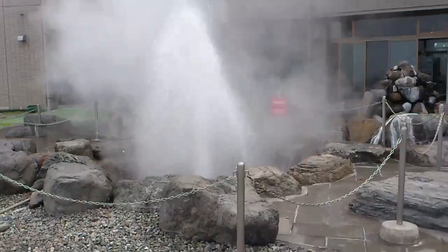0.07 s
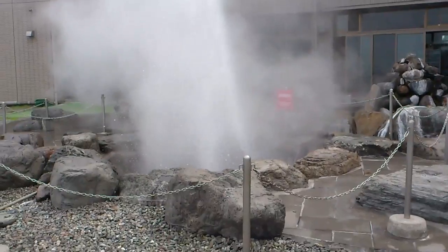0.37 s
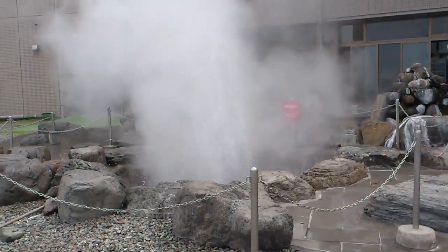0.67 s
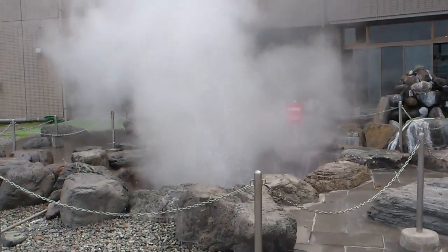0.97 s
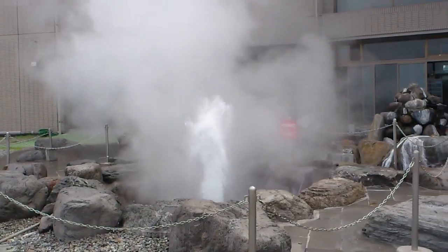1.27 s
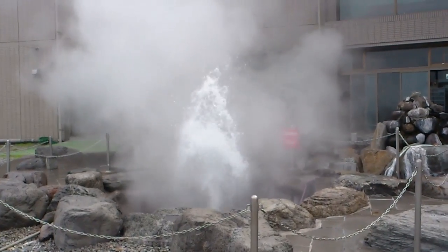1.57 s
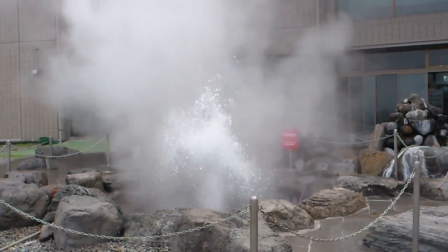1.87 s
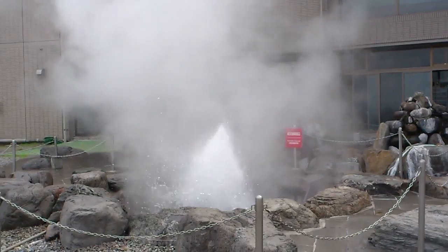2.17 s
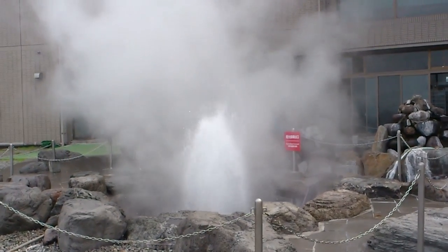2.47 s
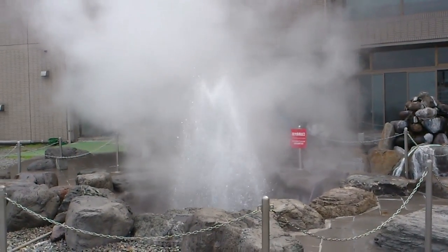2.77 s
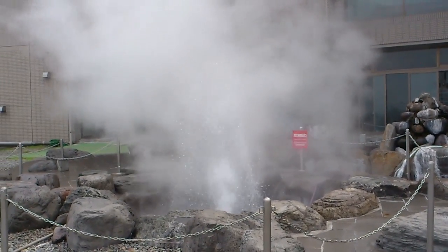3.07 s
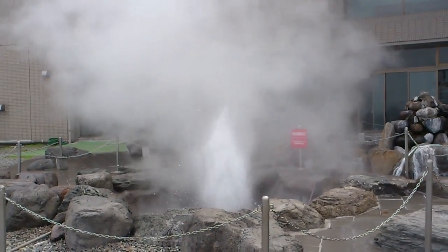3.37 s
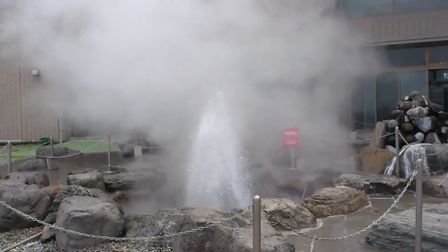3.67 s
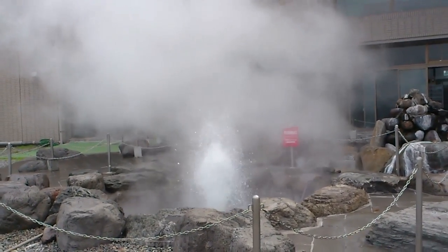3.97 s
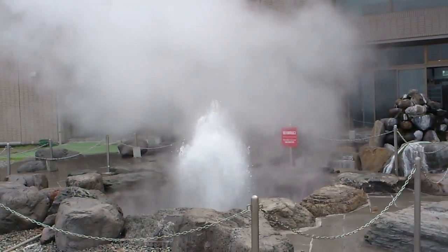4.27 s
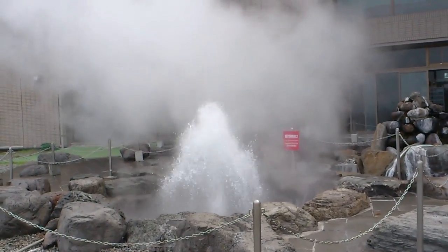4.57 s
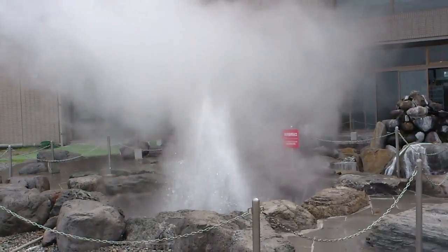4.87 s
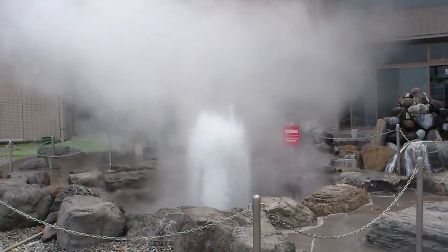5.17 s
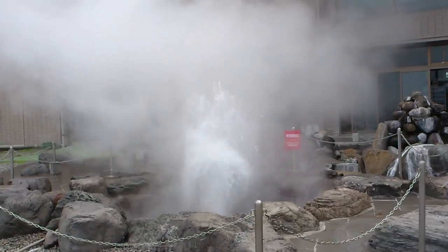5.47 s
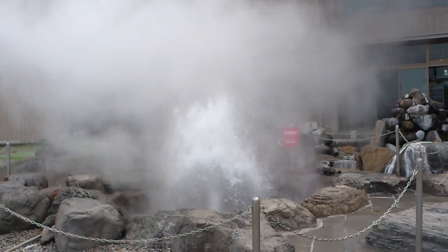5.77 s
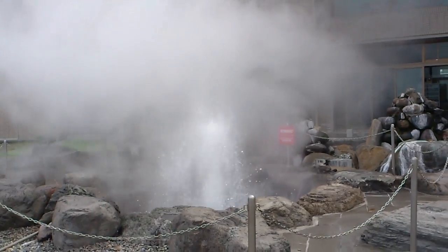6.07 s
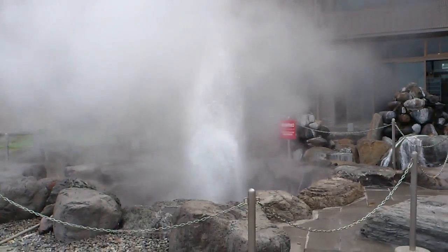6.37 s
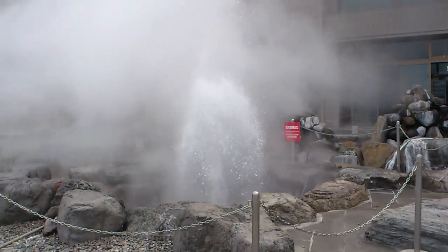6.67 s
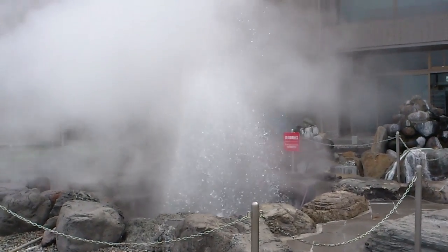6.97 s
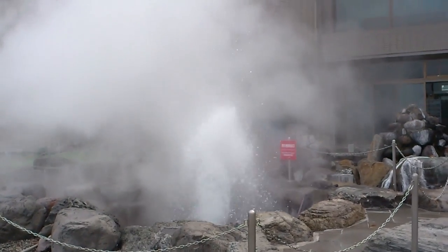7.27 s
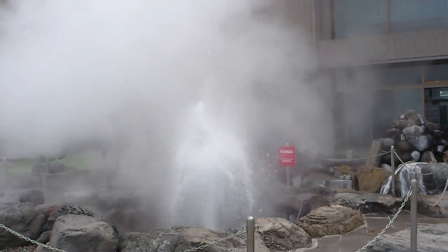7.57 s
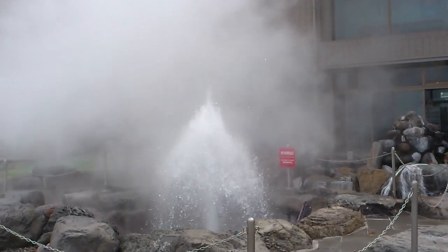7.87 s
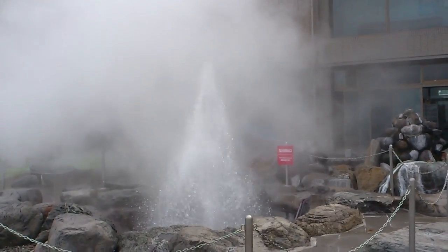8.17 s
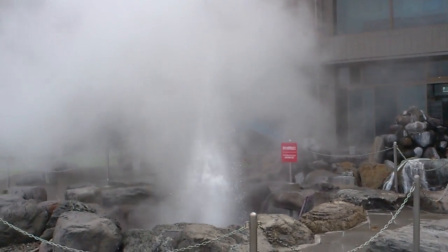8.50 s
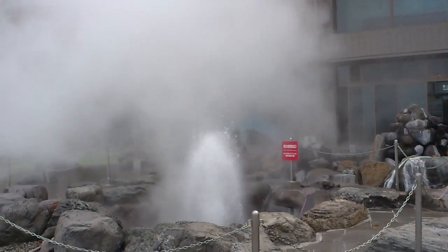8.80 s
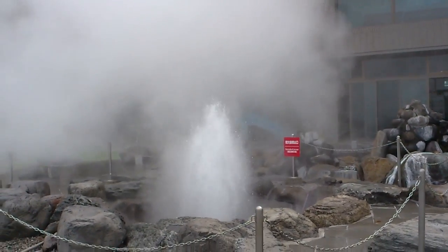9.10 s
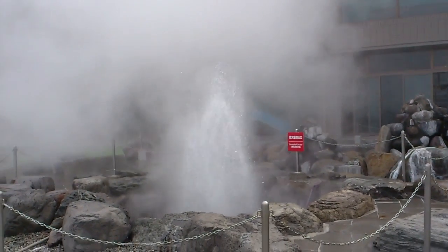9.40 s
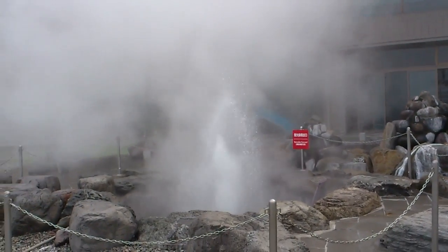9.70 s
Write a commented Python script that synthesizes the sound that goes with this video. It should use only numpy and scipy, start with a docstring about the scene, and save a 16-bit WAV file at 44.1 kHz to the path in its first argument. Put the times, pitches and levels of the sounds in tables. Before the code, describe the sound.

After a brief silence, a geyser hisses and sputters among rocks a few metres away outdoors. Its jet of steam and hot water swells and sinks, with drops pattering on the stones. Gusts of wind buffet the microphone with a low, distorted rumble that makes the hiss dip. The wind eases midway and the jet sounds clearer, then the gusts return.

```python
"""After a brief silence, a geyser is heard among rocks a few metres away outdoors. Its turbulent jet of
steam and hot water hisses and sputters, and drops patter back on the stones. From about 1 s, gusts buffet
the microphone, overload it and drive a fast limiter, so the hiss ducks under each blow. Soon after 5 s
the wind eases and the jet stands clear; from 6.5 s the gusts return, strongest just after 7 s."""
import sys
import numpy as np
from scipy import signal
from scipy.fft import rfft, irfft, next_fast_len
from scipy.io import wavfile
from scipy.ndimage import uniform_filter1d, map_coordinates

SR = 44100
rng = np.random.default_rng(int(sys.argv[2]) if len(sys.argv) > 2 else 0)


def to_wav(sig):
    """Store sig (one row per channel, or 1-D mono) as 16-bit WAV at the path in sys.argv[1].

    Samples outside -1..1 are clipped; the rate is SR.
    """
    pcm = np.clip(np.atleast_2d(sig), -1, 1) * 32767
    pcm = np.round(pcm).astype(np.int16)
    wavfile.write(sys.argv[1], SR, pcm.T)  # frames by channels


N = 433944

# Slow swelling and sinking of the jet: (time [s], relative level [dB])
JET_ENVELOPE = [(0.78, -34.5), (1.3, -32.5), (1.9, -33.5), (2.05, -37.5), (2.5, -30.5), (2.9, -38),
                (3.35, -35.5), (4.25, -33.5), (4.85, -39), (5.25, -30), (5.7, -35), (6.2, -30.5),
                (6.6, -32), (6.9, -40.5), (7.4, -28.5), (7.68, -30.5), (8.05, -40), (8.55, -34.5),
                (8.8, -39), (9.25, -34.5), (9.55, -39), (9.84, -29.5)]
# Spectrum of steam and atomised water: (frequency [Hz], relative spectral level [dB])
JET_SPECTRUM = [(200, 2), (450, -4), (700, 3), (1100, -2), (2000, -2), (3000, -3), (4000, 0.26),
                (4900, -0.2), (5700, 2.5), (6500, -0.1), (8000, -7), (10000, -9.5), (13000, -11.5),
                (15800, -8.5)]
# The breeze between gusts: (time [s], relative level [dB], eddy rate [Hz])
BREEZE_CURVE = [(0.78, -26.5, 160), (1.3, -30, 179.8), (1.62, -19.5, 150.2), (1.87, -29, 149.6),
                (2.68, -27, 164.9), (2.9, -22.5, 170.1), (3.28, -27, 199.7), (3.65, -15.5, 135),
                (4.2, -25, 189.9), (4.8, -18, 150), (5.2, -29, 120), (5.6, -27.5, 120), (6.0, -33.5, 139.8),
                (6.35, -29.5, 169.8), (7.0, -27, 165), (7.38, -16, 125.2), (7.68, -31.5, 144.7),
                (8.15, -23.5, 160.2), (8.8, -25.5, 170), (9.3, -31, 155), (9.84, -30, 245.2)]
# Gusts striking the microphone: (time [s], duration [s], relative level [dB], eddy rate [Hz])
GUST_EVENTS = [(0.973, 0.031, -15.5, 200.5), (1.015, 0.064, -14, 361), (1.203, 0.019, -19, 348),
               (1.43, 0.16, -15, 339.7), (1.637, 0.059, -12, 219.6), (1.726, 0.08, -16.5, 341.2),
               (2.26, 0.29, -20, 340), (2.574, 0.023, -17.5, 249.7), (2.652, 0.05, -20.5, 310),
               (2.792, 0.063, -16, 560.3), (2.881, 0.072, -21, 308.7), (2.995, 0.048, -17, 291.5),
               (3.168, 0.052, -19, 259.4), (3.399, 0.086, -16.5, 310.3), (3.563, 0.08, -12.5, 350.6),
               (3.736, 0.035, -12.5, 300.2), (3.809, 0.029, -12, 339.2), (4.004, 0.046, -15.5, 500.4),
               (4.06, 0.11, -19, 289), (4.343, 0.033, -17.5, 339.5), (4.448, 0.14, -17.5, 290.2),
               (4.648, 0.074, -16, 420), (4.735, 0.041, -17.5, 329), (4.845, 0.0075, -23, 430.6),
               (5.125, 0.013, -17, 249.7), (6.483, 0.017, -23, 330.3), (6.602, 0.013, -21.5, 448.8),
               (6.657, 0.034, -14.5, 318), (6.76, 0.03, -18.5, 311.5), (6.965, 0.018, -22, 338.8),
               (7.125, 0.04, -20.5, 319.3), (7.212, 0.072, -15, 399.2), (7.3, 0.035, -12, 330),
               (7.373, 0.046, -13.5, 311.5), (7.446, 0.097, -16.5, 418.5), (7.772, 0.03, -18, 169.2),
               (8.058, 0.03, -13.5, 348.8), (8.319, 0.085, -22, 247.2), (8.425, 0.042, -17, 329.8),
               (8.738, 0.024, -20.5, 369.2), (8.804, 0.02, -22.5, 329.4), (8.949, 0.027, -23.5, 320),
               (9.034, 0.016, -20.5, 359.2), (9.066, 0.035, -23, 461), (9.637, 0.048, -22.5, 321.4),
               (9.715, 0.042, -15.5, 420)]
# The hardest slaps of air: (time [s], relative level added to the wind's [dB])
VORTEX_SLAPS = [(1.514, 3), (1.734, 2), (2.482, 7), (2.51, 8), (2.804, 2), (3.563, 4), (3.632, 9),
                (4.005, 8), (4.695, 6), (7.215, 12), (7.472, 10), (8.432, 0), (8.93, 8.5), (9.091, 12),
                (9.729, 11.5)]

GROUND_DELAY_S, GROUND_SHARE = 0.001482, 0.15
GUST_ATTACK_S, GUST_RELEASE_S = .005, .008
BUFFET_HALF_S, BUFFET_DB, BUFFET_HURRY_DB = .011, 3, 3.5   # half-length, typical rise in level, eddy rate
CALM_DB, STIRRED_DB = -29, -21   # wind levels at which buffets begin and reach full strength
START_S, CUTOFF_HZ = .775, 15850


def geyser(sputter_db, flutter_db, patter_db):
    """Amplitude modulation: slugs of water chop the noise of the steam jet, while drops patter."""
    jet_db, = in_time(JET_ENVELOPE)
    jet = rng.standard_normal(N) * from_db(sputter_db * drift(34) + flutter_db * drift(60))
    patter = from_db(patter_db) * drops(per_s=1500, spread_db=6.0)
    direct = coloured(jet + patter, JET_SPECTRUM)
    return from_db(jet_db) * rms_one(direct + GROUND_SHARE * ground_echo(direct))


def drops(per_s, spread_db):
    """Shot noise: tiny impacts arrive independently at random moments, most of them faint."""
    sizes = from_db(spread_db * np.minimum(rng.exponential(1, N), 6))
    signs = rng.choice([-1, 1], N)
    lands = rng.random(N) < per_s / SR
    return rms_one(sizes * signs * lands)


def ground_echo(direct):
    """Reflection: the longer path by the ground delays the sound, and rough stone dulls it."""
    n = np.arange(N)
    delayed = np.interp(n - np.round(GROUND_DELAY_S * SR), n, direct)
    return signal.sosfilt(signal.butter(1, 7000, fs=SR, output="sos"), delayed)


def wind(steepness, lumpy_db, hurry_db, samples_per_eddy):
    """Convection: eddies are swept past the microphone, so faster air is both louder and brighter."""
    level_db, eddy_hz = gusting_flow()
    lumps = drift(69.58)
    push = buffets(level_db, count=150)
    hurry = from_db(hurry_db * lumps + BUFFET_HURRY_DB * push)
    eddies_passed = np.cumsum(eddy_hz * hurry) / SR
    pattern = eddies(steepness, samples_per_eddy, size=131072)
    pressure = map_coordinates(pattern, [eddies_passed * samples_per_eddy], order=3, mode="wrap")
    strength = from_db(level_db + lumpy_db * lumps + BUFFET_DB * push)
    return pressure * strength + slaps(level_db, width_s=0.00024, trim_db=-2.5)


def gusting_flow():
    """Unsteady flow: in each gust, level and eddy rate ramp, hold and return to those of the breeze."""
    level_db, eddy_hz = in_time(BREEZE_CURVE)
    for s, length, db, hz in GUST_EVENTS:
        corners = [s - GUST_ATTACK_S, s, s + length, s + length + GUST_RELEASE_S]
        at = np.arange(int(corners[0] * SR), min(int(corners[-1] * SR), N))
        share = np.interp(at / SR, corners, [0, 1, 1, 0])
        level_db[at] += share * (db - level_db[at])
        eddy_hz[at] += share * (hz - eddy_hz[at])
    return level_db, eddy_hz


def eddies(steepness, samples_per_eddy, size):
    """Frozen turbulence: a pattern whose spectrum is flat at large scales and falls at small ones."""
    cycles_per_eddy = np.fft.rfftfreq(size, 1 / samples_per_eddy)
    rolloff = 1 / np.sqrt(1 + (cycles_per_eddy / 0.87) ** (2 * steepness))
    pattern = irfft(rfft(rng.standard_normal(size)) * rolloff)
    local_power = uniform_filter1d(pattern ** 2, 3 * samples_per_eddy)
    return pattern / np.sqrt(local_power)


def buffets(level_db, count):
    """Intermittency: stirred air comes in brief, uneven pushes with lulls between; calm air has none."""
    late, size = rng.random((count, 2)).T
    middles = (np.arange(count) + late) * N / count
    half = BUFFET_HALF_S * SR
    push = np.zeros(N)
    for middle, strength in zip(middles, .5 + size):
        at = np.arange(max(int(middle - half), 0), min(int(middle + half), N))
        push[at] += strength * np.minimum(2 - 2 * np.abs(at - middle) / half, 1)
    return (push - push.mean()) * np.interp(level_db, [CALM_DB, STIRRED_DB], [0, 1])


def slaps(level_db, width_s, trim_db):
    """Bipolar pulses: a vortex crossing the port swings the pressure one way and then the other."""
    pressure = np.zeros(N)
    for (s, db), (stretch_db, side) in zip(VORTEX_SLAPS, rng.standard_normal((len(VORTEX_SLAPS), 2))):
        at = int(s * SR)
        near = np.arange(max(at - 256, 0), min(at + 256, N))
        phase = (near - at) / (width_s * SR * from_db(stretch_db))
        pulse = phase * np.exp(.5 - phase ** 2 / 2)
        pressure[near] += np.sign(side) * from_db(level_db[at] + db + trim_db) * pulse
    return pressure


def port(pressure, low_cut_hz, boom_hz, boom_q, boom_db):
    """Resonance: the microphone port booms broadly in the bass and sheds the slowest swings."""
    passed = signal.sosfilt(signal.butter(1, low_cut_hz, "high", fs=SR, output="sos"), pressure)
    boom = signal.lfilter(*signal.iirpeak(boom_hz, boom_q, fs=SR), passed)
    return passed + from_db(boom_db) * boom


def limiter(x, threshold_db, release_db_per_s, attack_s, sense_hz):
    """Gain control: the gain drops fast under a bass peak and recovers steadily; ticks slip through."""
    sensed = signal.sosfilt(signal.butter(1, sense_hz, fs=SR, output="sos"), x)
    over_db = np.maximum(20 * np.log10(np.abs(sensed) + 1e-9) - threshold_db, 0)
    ramp = release_db_per_s * np.arange(N) / SR
    held_db = np.maximum.accumulate(over_db + ramp) - ramp
    pole = np.exp(-1 / (attack_s * SR))
    return x * from_db(-signal.lfilter([1 - pole], [1, -pole], held_db))


def drift(corner_hz):
    """Low-pass filtering turns white noise into a slow random fluctuation of unit spread."""
    step, settle = 40, 2000   # samples per step, steps for the filter to settle
    pole = np.exp(-2 * np.pi * corner_hz * step / SR)
    white = rng.standard_normal(N // step + settle + 2)
    slow = signal.lfilter([1], [1, -2 * pole, pole * pole], white)[settle:]
    return np.interp(np.arange(N) / step, np.arange(len(slow)), rms_one(slow))


def coloured(x, spectrum):
    """Spectral shaping: each frequency is weighted by the given curve; the result has unit power."""
    size = next_fast_len(N)
    hz, db = np.transpose(spectrum)
    bin_hz = np.maximum(np.fft.rfftfreq(size, 1 / SR), 1)
    gain = from_db(np.interp(np.log(bin_hz), np.log(hz), db))
    return rms_one(irfft(rfft(x, size) * gain, size)[:N])


def in_time(rows):
    """Linear interpolation gives each column of a curve at every sample."""
    times, *columns = np.transpose(rows)
    return [np.interp(np.arange(N) / SR, times, column) for column in columns]


def from_db(db):
    """The decibel scale: 20 dB is a factor of ten in amplitude."""
    return 10 ** (np.asarray(db) / 20)


def rms_one(x):
    """Normalisation to unit power."""
    return x / np.sqrt(np.mean(x ** 2) + 1e-20)


def scene():
    """Superposition: the pressures of geyser and wind add at one microphone."""
    water = from_db(-0.64) * geyser(sputter_db=1.5, flutter_db=1.37, patter_db=-8)
    air = from_db(0.1) * wind(steepness=2.56, lumpy_db=1.34, hurry_db=1.55, samples_per_eddy=32)
    rumble = port(air, low_cut_hz=29.0, boom_hz=108, boom_q=2.4, boom_db=-16.5)
    return (water + rumble)[None]


def record(dry):
    """Saturation: peaks that pass the limiter clip flat; the band-limited sound cuts in after silence."""
    limited = limiter(dry[0], threshold_db=-21.0, release_db_per_s=316, attack_s=0.00074, sense_hz=2680)
    ceiling = from_db(-20)
    clipped = limited / (1 + (limited / ceiling) ** 16) ** (1 / 16)
    running = np.arange(N) / SR >= START_S
    band_limit = signal.ellip(12, .1, 90, CUTOFF_HZ, fs=SR, output="sos")
    return signal.sosfilt(band_limit, clipped * running)[None]


dry = scene()
out = record(dry)
to_wav(out)
```